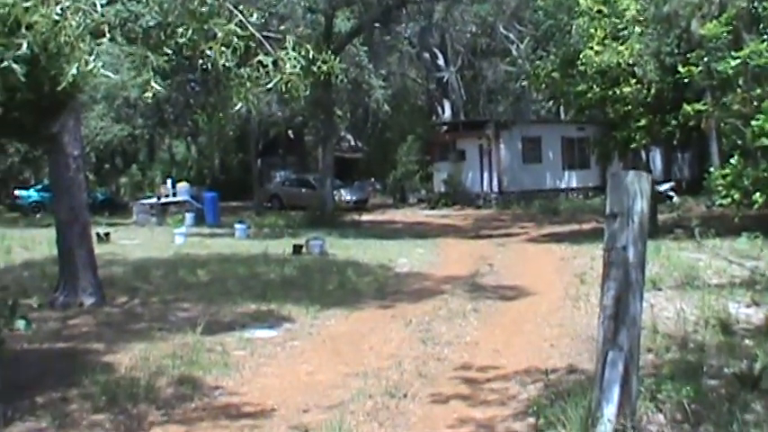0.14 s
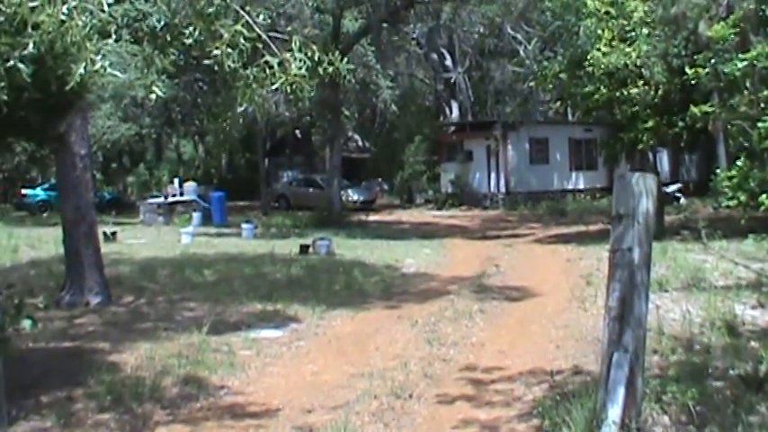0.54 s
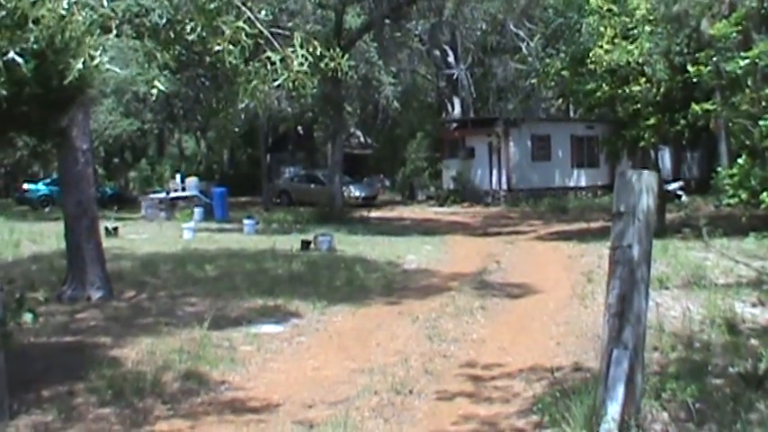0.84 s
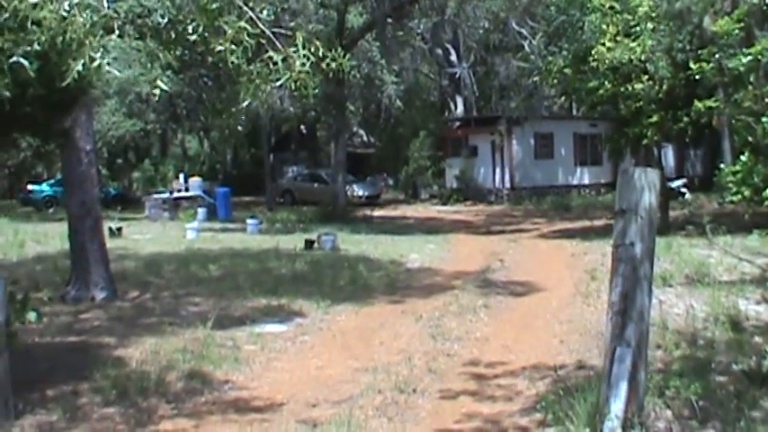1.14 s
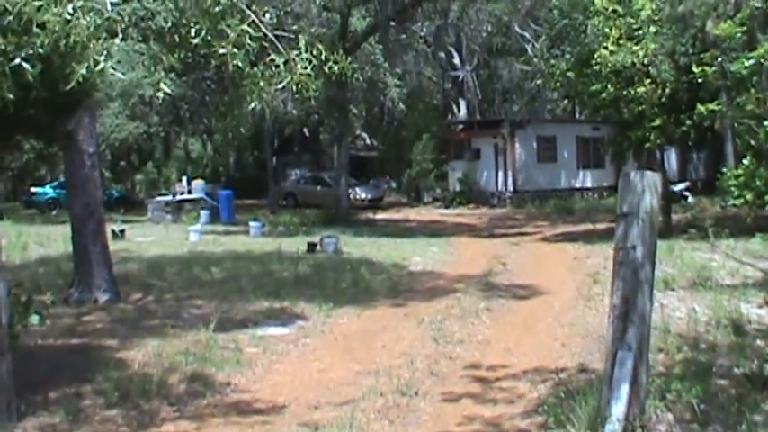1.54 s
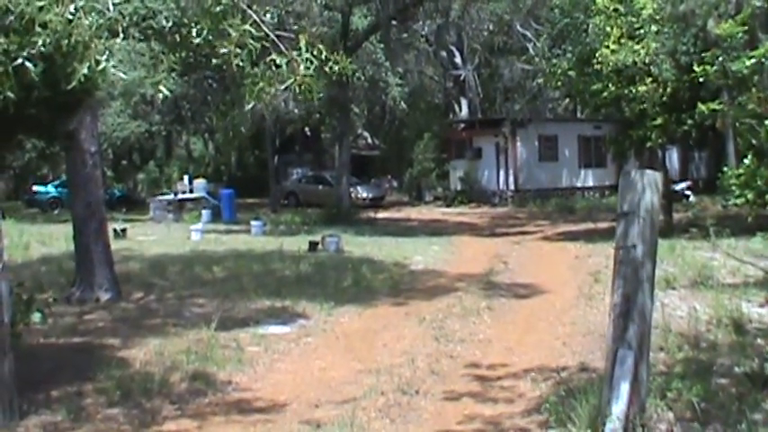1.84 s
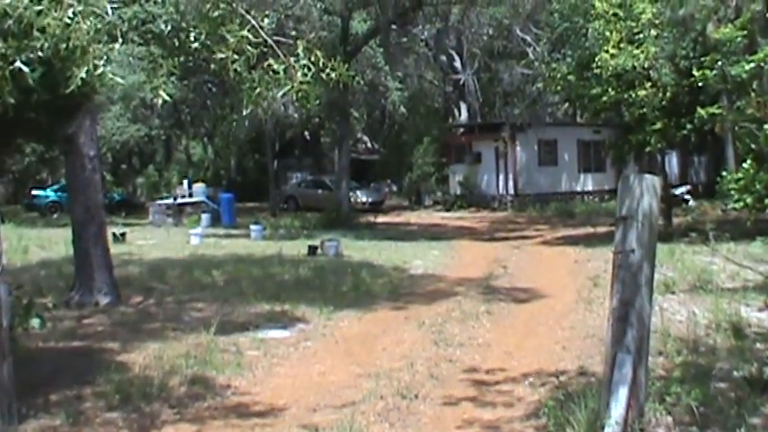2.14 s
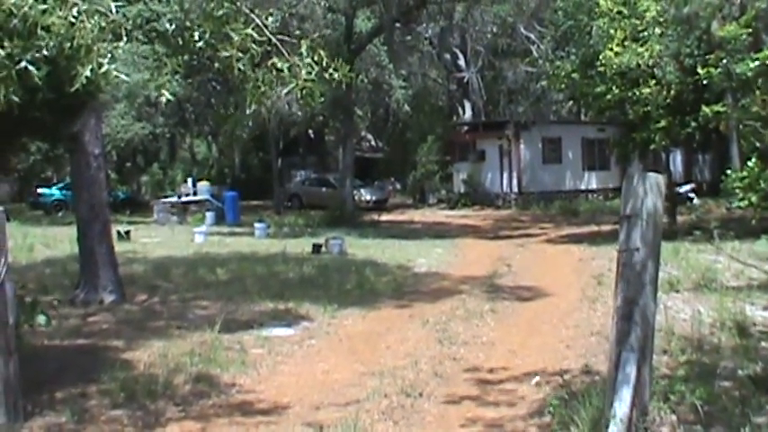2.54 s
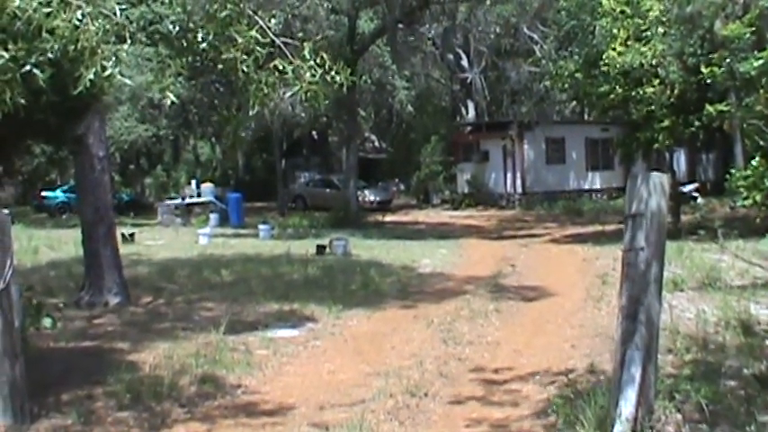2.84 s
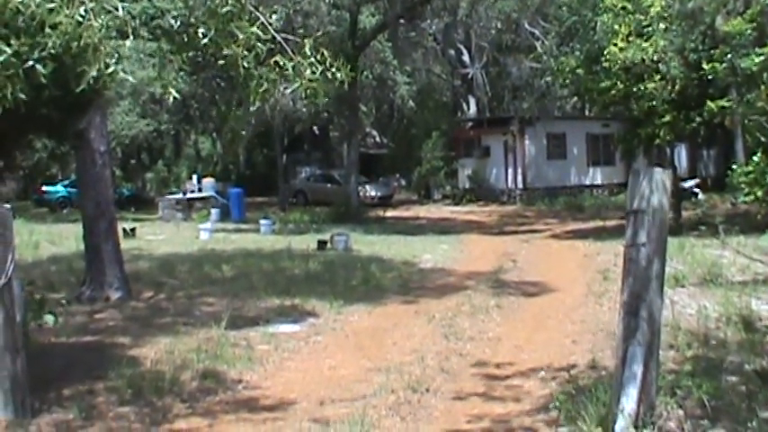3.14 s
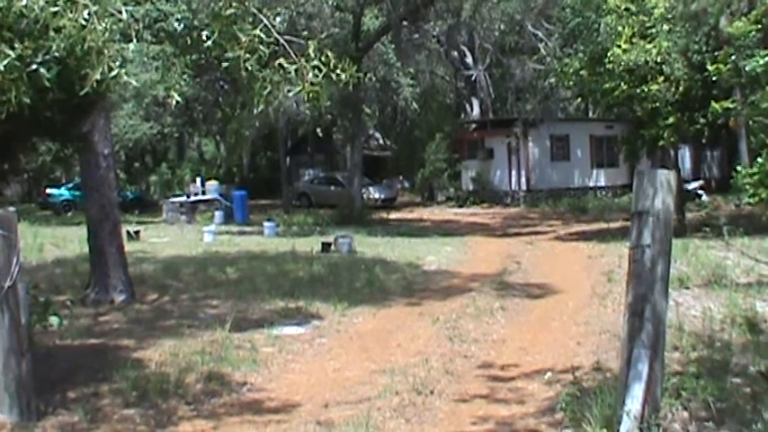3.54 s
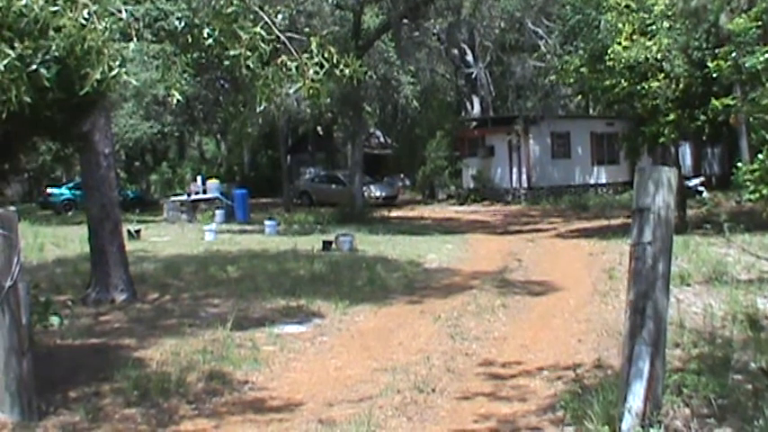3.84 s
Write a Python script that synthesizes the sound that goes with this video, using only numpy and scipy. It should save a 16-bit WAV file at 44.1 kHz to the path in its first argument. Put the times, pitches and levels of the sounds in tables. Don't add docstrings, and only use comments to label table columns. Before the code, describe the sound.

A small motorcycle dominates from 2.3 seconds, starting with a rattle and revving hard, peaking near 2.5, 3.15 and 3.85, with thumping, ringing exhaust, raspy roar, airy hiss and short dull echoes; it is still running at the end. Before it, soft outdoor air, a faint high cricket trill and a distant truck's rising hum; a dry twig tick at 0.4, low microphone bump at 0.9, thin electronic whine throughout.

```python
import sys
import numpy as np
from scipy import signal
from scipy.fft import rfft, irfft
from scipy.io import wavfile
from scipy.ndimage import uniform_filter1d

SR = 44100
rng = np.random.default_rng(int(sys.argv[2]) if len(sys.argv) > 2 else 0)


def magnitude_from_level(level_db):
    exponent = np.asarray(level_db, float) / 20
    return 10 ** exponent


def dump(signal):
    limited = np.clip(np.atleast_2d(signal).T, -1, 1)
    pcm = np.round(limited * 32767).astype(np.int16)
    wavfile.write(sys.argv[1], SR, pcm)


N = 176400
TIME_S = np.arange(N) / SR

# pitch_hz, likeness (0 to 1)
BIKE_LIKENESS = [(60, 0.9), (180, 0.33), (550, 0.95), (1650, 1), (4970, 0.93), (15000, 0.9)]
EVEN_S = .05


def in_time(rows, lead_s=0):
    s, *columns = np.transpose(rows)
    return [np.interp(TIME_S + lead_s, s, column) for column in columns]


def at_hz(points):
    hz, value = np.transpose(points)
    return np.interp(np.log(np.fft.rfftfreq(N, 1 / SR) + 1), np.log(hz + 1), value)


def rms_one(x):
    return x / np.sqrt(np.mean(x ** 2) + 1e-20)


def low_pass(x, order, cut_hz):
    return signal.sosfilt(signal.butter(order, cut_hz, fs=SR, output="sos"), x)


def drift(rate_hz):
    r = np.exp(-80 * np.pi * rate_hz / SR)
    slow = signal.lfilter([1], [1, -2 * r, r * r], rng.standard_normal(N // 40 + 2002))
    slow = slow[2000:]
    return np.interp(np.arange(N) / 40, np.arange(len(slow)), rms_one(slow - slow.mean()))


def resonate(x, peaks, order=1):
    out = 0
    for k, (hz, width_hz, db) in enumerate(peaks):
        r = np.exp(-np.pi * width_hz / SR)
        top = [(1 - r * r) / 2, 0, (r * r - 1) / 2]
        bottom = [1, -2 * r * np.cos(2 * np.pi * hz / SR), r * r]
        ring = x + 1e-18
        for _ in range(order):
            ring = signal.lfilter(top, bottom, ring)
        out = out + (-1) ** k * magnitude_from_level(db) * ring
    return out


def noise(spectrum, likeness, gate=1):
    mid, side = rfft(gate * rng.standard_normal((2, N))) * magnitude_from_level(at_hz(spectrum))
    alike = np.clip(at_hz(likeness), 0, 1)
    return rms_one(irfft(np.sqrt(1 + alike) * mid + np.sqrt(1 - alike) * side * [[1], [-1]], N))


def ports(x, balance, phase=((0, 0), (1, 0))):
    half = magnitude_from_level(at_hz(balance) / 2) * np.exp(.5j * at_hz(phase))
    gains = 2 * np.array([half, 1 / half]) / (abs(half) + 1 / abs(half))
    return irfft(rfft(x * np.ones((2, 1))) * gains, N)


def truck():
    # start_s, main_pitch_hz, main_level_db, other_tones_level_db
    speeding = [
        (0, 110, -51.5, -51.5),
        (.2, 112.5, -43.5, -55.5),
        (.68, 118, -41, -55),
        (.76, 119.5, -62, -48.5),
        (1.0, 124, -48.5, -47.5),
        (1.4, 131, -48.5, -47.5),
        (1.9, 134.5, -49, -49.5),
        (2.3, 136.5, -46.5, -47),
    ]
    # multiple of the main pitch, level_db
    other_tones = [(0.398, -4), (0.598, -4), (1.401, -10.5), (1.59, -1.5), (2.0, -36), (2.2, -7),
                   (2.5, -11), (2.6, -3), (2.95, -8), (3.599, -7.5)]
    hz, main_db, rest_db = in_time(speeding)
    phase = 2 * np.pi * np.cumsum(hz) / SR
    out = magnitude_from_level(main_db + drift(19)) * np.sin(phase)
    for multiple, db in other_tones:
        level = magnitude_from_level(rest_db + db + 1.5 * drift(16.0))
        wander = 2 * np.pi * rng.random() + .5 * drift(2.4)
        out = out + level * np.sin(multiple * phase + wander)
    return np.sqrt(2) * out


def air():
    # pitch_hz, level_db per Hz
    wash = [(28, -8), (50, -8), (200, -5), (650, -9), (1000, -15.5), (1800, -20.5), (2800, -26),
            (15800, -39)]
    # pitch_hz, left_minus_right_db
    balance = [(60, 13), (180, 0), (550, 2.5), (1650, 2.5), (4970, 0.0), (15000, 0.5)]
    # pitch_hz, likeness of both channels (0 to 1)
    likeness = [(60, 0.88), (180, 1), (550, 0.92), (1650, 0.6), (4970, 0.4), (15000, 0.8)]
    level_db, rise_db, rise_s, patchy_db = -39.5 - 2.5, -2, 1, .6
    swell_db = rise_db * np.exp(-TIME_S / rise_s)
    level = magnitude_from_level(level_db + swell_db + patchy_db * drift(2.6))
    return ports(level * noise(wash, likeness), balance)


def cricket():
    pitch_hz, pulses_per_s, sharpness, start_s = 3391, 57.5, 1.3, .004
    level_db, fade_db_per_s, pan_db = -60.5, -1, 1
    pulses = (.5 + .5 * np.cos(2 * np.pi * pulses_per_s * (TIME_S - start_s))) ** sharpness
    tone = rms_one(pulses * np.sin(2 * np.pi * pitch_hz * TIME_S + .3 * drift(6)))
    fade_db = fade_db_per_s * (TIME_S - 0.5)
    waver_db = .5 * drift(0.8) + .3 * drift(14)
    return magnitude_from_level(level_db + fade_db + waver_db) * tone * magnitude_from_level([[pan_db], [-pan_db]])


def whine():
    pitch_hz, level_db = 15735, -70
    return magnitude_from_level(level_db) * np.sin(2 * np.pi * pitch_hz * TIME_S)


def twig_tick():
    # pitch_hz, width_hz, level_db
    twig = [(3050, 170, 0), (4800, 900, -18), (1500, 600, -18)]
    start_s, peak_db = .403, -37
    click = np.zeros(N)
    click[int(start_s * SR)] = 1
    ring = resonate(click, twig)
    return magnitude_from_level(peak_db) * ring / abs(ring).max()


def knock():
    middle_s, pitch_hz, width_s, level_db = .892, 75, 0.0072, -27.5
    t = TIME_S - middle_s
    return magnitude_from_level(level_db) * np.exp(-(t / width_s) ** 2 / 2) * np.sin(2 * np.pi * pitch_hz * t + .5)


def clatter(warm, puff):
    # pitch_hz, level_db per Hz
    rattle = [(260, -16), (450, 5), (643, 6.5), (991, -8), (1070, -18), (1150, -9.5), (3620, -20),
              (11000, -23.5), (15800, -33)]
    level_db, kick_s, kick_db = -37.5, 2.25, -9
    kicked = magnitude_from_level(kick_db) * np.clip((TIME_S - kick_s) / .03, 0, 1)
    rattling = noise(rattle, BIKE_LIKENESS, gate=1 + .2 * puff)
    return np.maximum(warm, kicked) * magnitude_from_level(level_db + 0.31 * drift(33)) * rattling


def stumbles():
    # middle_s, half_length_s, change_db
    moments = [
        (2.526, 0.019, 0),
        (2.629, 0.0088, 4),
        (2.8, .02, 3.5),
        (3.219, 0.017, -8),
        (3.408, 0.014, -3.5),
        (3.58, 0.0081, 4),
        (3.785, 0.0047, 0),
        (3.914, 0.007, -6),
    ]
    middle_s, half_s, db = np.transpose(moments)[:, :, None]
    return np.sum(db * np.exp(-((TIME_S - middle_s) / half_s) ** 2 / 2), axis=0)


def exhaust_pipe(clicks, gusts, load, strength_db):
    # pitch_hz, width_hz, level_db
    pipe_tones = [(66, 20, 1), (115, 80, -9), (178, 22, -5), (214, 19, 5.5), (255, 30, -10),
                  (308, 20, -2.5), (343, 20, -5), (450, 120, -13)]
    # pitch_hz, width_hz, level_db
    thump_tones = [(79, 37, -1.5), (168.4, 51.6, 2), (251, 81, 1.5), (313.5, 74, -2), (814, 43, -22)]
    # pitch_hz, width_hz, level_db
    drone_tone = [(62.6, 6.3, 5)]
    pipe_db, pulling_db, thump_db, rumble_db = 5, -4, 7, -12
    level_db, dull_above_hz = 0.5, 650
    blown = clicks + magnitude_from_level(rumble_db) * gusts[0]
    ringing = resonate(blown * magnitude_from_level(pipe_db + load * pulling_db), pipe_tones, order=2)
    thump = magnitude_from_level(thump_db) * resonate(blown * load, thump_tones)
    pipe = low_pass(ringing - thump + resonate(gusts[1], drone_tone), 2, dull_above_hz)
    power = uniform_filter1d(pipe ** 2, size=int(EVEN_S * SR))
    power = abs(uniform_filter1d(power, size=int(EVEN_S * SR)))
    evened = pipe / np.sqrt(power + .05 * np.mean(pipe ** 2))
    return evened * magnitude_from_level(level_db + strength_db + stumbles())


def singing(turns):
    # middle_s, half_length_s, multiple of the firing rate, level_db
    tones = [(2.394, 0.023, 1, -19.5), (2.431, 0.023, 2, -22.5), (2.48, 0.02, 2, -17),
             (2.588, 0.014, 1, -22.5), (2.72, 0.041, 2, -19), (3.15, 0.018, 1, -24),
             (3.243, 0.036, 1, -22.5), (2.517, 0.015, 3, -26), (3.817, 0.018, 2, -17),
             (2.92, 0.037, 4, -26.5), (3.015, 0.015, 3, -21.5), (3.076, 0.017, 3, -19),
             (3.29, 0.027, 2.5, -23), (3.366, 0.056, 4, -36), (3.523, 0.022, 3, -22.5),
             (3.608, 0.028, 3, -28), (3.607, 0.024, 5, -31), (3.725, 0.036, 3, -19.5),
             (3.847, 0.035, 3, -22), (3.973, 0.028, 3, -28.5)]
    middle_s, half_s, order, db = np.transpose(tones)[:, :, None]
    swell = magnitude_from_level(db) * np.exp(-((TIME_S - middle_s) / half_s) ** 4 / 2)
    waves = np.sin(np.pi * np.round(2 * order) * turns)
    return np.sqrt(2) * np.sum(swell * waves, axis=0)


def bark(blown):
    # peak_s, rise_s, fall_s, level_db
    barks = [
        (2.53, 0.073, 0.053, -24),
        (3.149, 0.032, 0.055, -23.5),
        (3.83, 0.034, 0.032, -24),
    ]
    # pitch_hz, width_hz, level_db
    mouth = [(680, 360, -6.5), (834, 70, 6), (1050, 92, 1.5), (1760, 350, -8.5), (2370, 150, -14.5)]
    peak_s, rise_s, fall_s, db = np.transpose(barks)[:, :, None]
    t = TIME_S - peak_s
    ring = resonate(blown, mouth)
    ring = ring / np.sqrt(uniform_filter1d(ring ** 2, size=int(EVEN_S * SR)) + 1e-12)
    swell = np.exp(-(t / np.where(t < 0, rise_s, fall_s)) ** 2 / 2)
    return ring * np.sum(magnitude_from_level(db) * swell, axis=0)


def echoes(x):
    # left_delay_s, right_delay_s, level_db
    reflections = [(0.01, 0.0124, -28), (.047, .044, -17.5), (.093, .099, -44), (.17, 0.11, -14.5)]
    out = np.zeros((2, N))
    dull = low_pass(x, 1, 1200)
    for left_s, right_s, db in reflections:
        for side, delay_s in enumerate((left_s, right_s)):
            lag = int(delay_s * SR)
            out[side, lag:] += magnitude_from_level(db) * dull[:N - lag]
    return out


def rasp(engine, warm, gate):
    # pitch_hz, level_db per Hz
    roar = [(240, -16), (400, -4), (571, -5.5), (634, -10), (816, -1), (1230, -14), (1700, -8.5),
            (3200, -20), (4160, -67), (7040, -120)]
    # pitch_hz, width_hz, level_db
    sheet_metal = [(651, 30, -4), (800, 50, -8), (1065, 30, -6), (1162, 14, -6), (1363, 25, -7),
                   (1612, 22, -4), (1685, 40, -14), (1880, 40, -9), (2150, 30, -13), (2390, 55, -8),
                   (2910, 25, -8), (3690, 22, -3)]
    level_db, follows, lead_s = -20.5, 1.38, .014
    tail_s, tail_db = 0.23, -11.5
    early_db = in_time(engine, lead_s)[2]
    power = warm * magnitude_from_level(2 * follows * (early_db - early_db.max()))
    fade = np.exp(-2 / tail_s / SR)
    tail = signal.lfilter([1 - fade], [1, -fade], power)
    power = power + magnitude_from_level(2 * tail_db) * tail * 10
    rough = noise(roar, BIKE_LIKENESS, gate=gate)
    return magnitude_from_level(level_db) * np.sqrt(power) * (rough + 4.17 * resonate(rough, sheet_metal))


def intake_hiss(hiss_db, load, gate):
    # pitch_hz, level_db per Hz
    rush = [(1410, -60), (2400, -2.5), (3420, -9), (3820, -7), (4400, -10), (7500, -13), (10000, -15),
            (12000, -21.5), (15800, -42)]
    level_db, airy_hz, airy_from_db, airy_span_db = 1.52, 11900, -42, 8.5
    hiss = magnitude_from_level(level_db + hiss_db) * noise(rush, BIKE_LIKENESS, gate=gate)
    body = low_pass(hiss, 2, airy_hz)
    openness = np.clip((hiss_db - airy_from_db) / airy_span_db + 2.1 * load, 0, 1.6)
    return body + openness * (hiss - body)


def valves(warm, puff, strike_db, gust):
    # pitch_hz, width_hz, level_db
    metal = [(5500, 900, 2.5), (9500, 1000, 1), (11050, 1000, 0.5)]
    ticking = (1 + puff) ** 6 * magnitude_from_level(strike_db)
    return magnitude_from_level(-56) * warm * rms_one(resonate(ticking * gust, metal))


def motorcycle():
    # start_s, firings_per_s, firing_level_db, hiss_level_db
    blips = [
        [(2.31, 37, -33, -58), (2.356, 45, -23, -47), (2.4, 70, -17, -41), (2.5, 126, -15, -29),
         (2.54, 140, -19, -27), (2.6, 122, -21, -32), (2.69, 106.5, -20, -41), (2.745, 105, -21, -45),
         (2.79, 88, -25, -49)],
        [(2.83, 81, -25, -51), (2.89, 76, -23, -53), (2.98, 71, -21.5, -56), (3.04, 70.5, -21, -50),
         (3.075, 73, -19, -46), (3.105, 93, -14, -41), (3.14, 107.5, -18, -35), (3.18, 107.5, -21, -30),
         (3.24, 99, -21, -33), (3.34, 79, -21, -45), (3.43, 75, -24, -52), (3.515, 69.5, -22, -52)],
        [(3.558, 63, -32, -54), (3.62, 59, -25, -50), (3.69, 69, -26, -50), (3.75, 75, -20, -43),
         (3.78, 93, -15, -37), (3.815, 110, -16, -30.5), (3.85, 114.5, -20, -27), (3.9, 112, -20, -28.5),
         (3.95, 104.5, -21, -35), (4, 102, -23, -39)],
    ]
    # pitch_hz, left_minus_right_db
    balance = [(60, -10), (150, -6.5), (380, -2.5), (950, 0), (2380, 1.0), (5980, 3), (15000, -1)]
    # pitch_hz, left_lead_radians
    phase = [(0, 0), (1380, 0.53), (6030, 0.41), (7750, 0.42), (10700, 0.24), (15600, 0.0)]
    first_firing_s, warm_up_s = 2.322, .12
    steady_db, lumpy_db = 1.0, 3.0
    steady_timing, lumpy_timing = .012, .035
    engine, since = np.vstack(blips), TIME_S - first_firing_s
    rate, strength_db, hiss_db = in_time(engine)
    running = np.clip(since / .01 + 1, 0, 1)
    warm = np.clip(since / warm_up_s + .1, 0, 1) ** 2
    load = np.clip(uniform_filter1d(np.gradient(rate) * SR, size=1500) / 200, 0, 1)

    turns = np.cumsum(rate * (since >= 0)) / SR
    firing = turns.astype(int)
    at = np.searchsorted(turns, np.arange(int(turns[-1]) + 1) + 1e-6)
    chance = rng.standard_normal((400, 2))[:len(at)]
    timing = lumpy_timing + load[at] * (steady_timing - lumpy_timing)
    shift = chance[:, 0] * timing * SR / rate[at]
    spread_db = lumpy_db + load[at] * (steady_db - lumpy_db)
    clicks = np.zeros(N)
    places = np.clip(at + shift.astype(int), 0, N - 1)
    clicks[places] = -magnitude_from_level(chance[:, 1] * spread_db) / rate[at] * 80
    gusts = running * rng.standard_normal((2, N)) * np.sqrt(80 / SR)

    puff = np.cos(2 * np.pi * turns)
    each = magnitude_from_level(1.1 * rng.standard_normal(400))[firing]
    strike_db = 4 * chance[np.minimum(firing, len(at) - 1), 0]
    pipe = exhaust_pipe(clicks, gusts, load, strength_db)
    pipe = pipe + singing(turns) + bark(clicks + gusts[0])
    out = pipe + echoes(pipe) + rasp(engine, warm, each * (1 + .45 * puff))
    out = out + running * intake_hiss(hiss_db, load, each * (1 + .2 * puff))
    out = out + valves(warm, puff, strike_db, gusts[1]) + clatter(warm, puff)
    return ports(out, balance, phase)


def scene():
    return truck() + air() + cricket() + whine() + twig_tick() + knock() + motorcycle()


def top_cut(x):
    return signal.sosfilt(signal.butter(12, 15790, fs=SR, output="sos"), x)


def record(dry):
    headroom, low_hz = .9, 47
    rounded = headroom * np.tanh(dry / headroom)
    mix = signal.sosfilt(signal.butter(3, low_hz, "high", fs=SR, output="sos"), rounded)
    return top_cut(mix)


dry = scene()
out = record(dry)
dump(out)
```